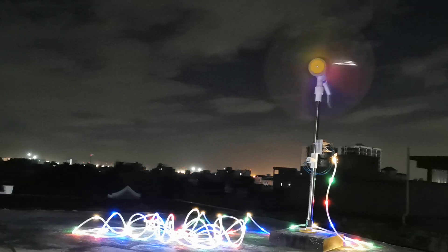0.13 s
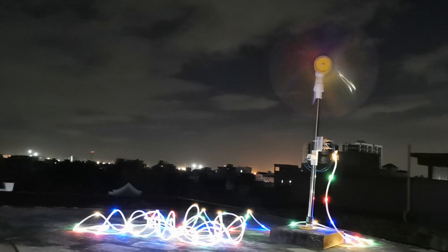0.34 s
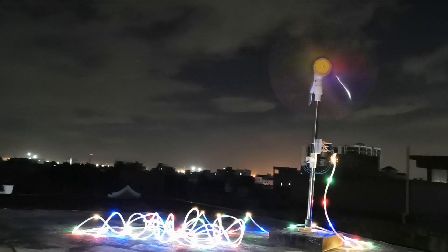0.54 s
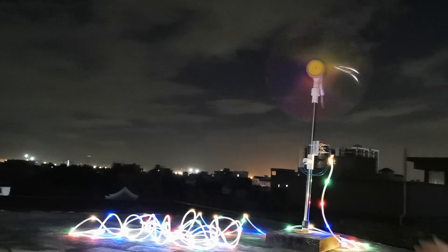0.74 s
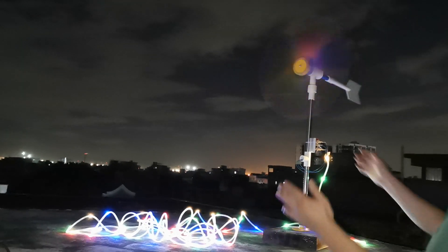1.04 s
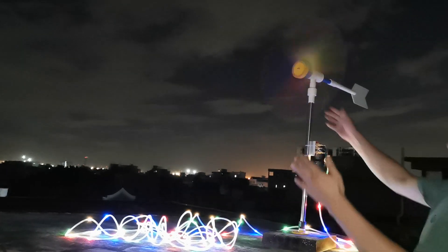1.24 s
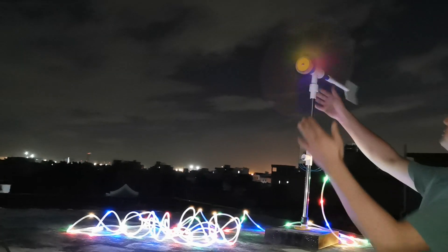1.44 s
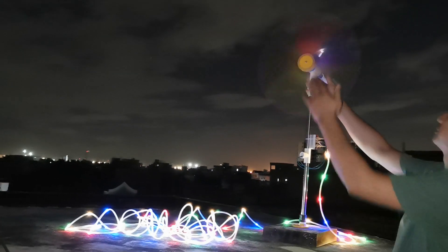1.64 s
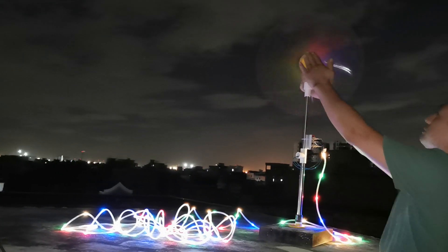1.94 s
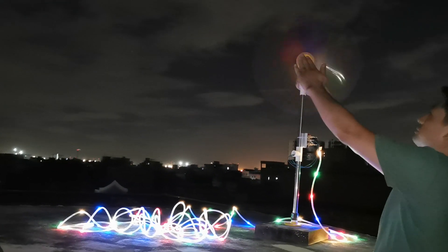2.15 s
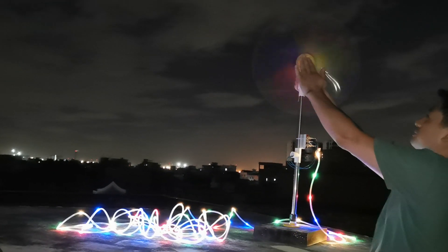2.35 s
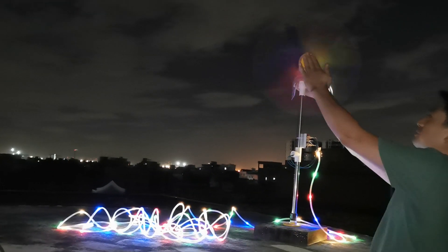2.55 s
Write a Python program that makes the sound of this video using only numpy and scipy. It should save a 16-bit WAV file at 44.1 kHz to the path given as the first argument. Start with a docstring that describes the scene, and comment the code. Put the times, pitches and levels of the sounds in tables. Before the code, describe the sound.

Wind buffeting dominates. Silence until 0.2 s, then an abrupt start of low rumble, fluttering gusts and dull slaps on a handheld stereo microphone on an open rooftop, uneven between sides, strongest on the right around 1.1-1.9 s. Faint airy hiss wavers behind. A tiny dry tick at 1.1 s; bright bangle clinks at 1.5-1.8 s, cut short by skin. Wind fades lower after 2.3 s.

```python
"""After a short silence the sound starts abruptly: gusty night wind on a handheld microphone on a rooftop.
Each of its two ports has its own rumble, flutter and slaps, made from noise and short damped swings.
Behind it hisses the air round a small wind turbine: noise whose bands swell and waver.
Later comes a dry tick of noise, then metal bangles clink on a wrist as a hand reaches up: decaying sines
with a crack of noise. The wrist turns, then skin mutes the ring."""
import sys
import numpy as np
from scipy import signal
from scipy.fft import rfft, irfft
from scipy.io import wavfile
from scipy.ndimage import uniform_filter1d, map_coordinates

SR = 44100
rng = np.random.default_rng(int(sys.argv[2]) if len(sys.argv) > 2 else 0)


def inscribe(sig):
    """Save sig as 16-bit PCM at rate SR to the path in sys.argv[1].

    A 1-D sig is mono; a 2-D sig holds one channel per row.
    Samples are clipped to [-1, 1] before scaling.
    """
    pcm = np.round(np.clip(np.atleast_2d(sig).T, -1, 1) * 32767)
    wavfile.write(sys.argv[1], SR, pcm.astype(np.int16))


def attenuation_scalar(level_db):
    """Turn a level in dB into a linear amplitude multiplier (20 dB per decade)."""
    decades = np.asarray(level_db, float) / 20
    return 10 ** decades


N = 119070

# Strength of the wind on each port: (t/s, rumble level/dB, flutter level/dB)
LEFT_GUSTS = [(0.205, -30.5, -40.5), (0.315, -17, -29), (0.335, -23, -37.5), (0.365, -18, -24),
              (0.405, -27.5, -37), (0.535, -32, -42), (0.585, -18.5, -24), (0.655, -23.5, -35),
              (0.685, -11.5, -29), (0.755, -23.5, -33.5), (0.805, -16, -31.5), (0.835, -32, -42.5),
              (0.915, -20, -24), (1.125, -23, -37), (1.215, -17, -24.5), (1.245, -30, -35.5),
              (1.335, -27, -32), (1.365, -31, -43.5), (1.515, -25, -31), (1.565, -26, -40.5),
              (1.675, -32, -38.5), (1.785, -23, -25), (1.845, -20.5, -30), (1.945, -22, -27.5),
              (1.985, -23.5, -36), (2.015, -20, -26.5), (2.065, -29, -24.5), (2.085, -18.5, -33.5),
              (2.245, -30, -42.5), (2.325, -19.5, -44), (2.365, -34, -43.5), (2.69, -39.5, -51.5)]
RIGHT_GUSTS = [(0.205, -26, -31.5), (0.305, -37.5, -26.5), (0.325, -26, -35.5), (0.355, -32, -26),
               (0.415, -19.5, -35), (0.47, -34, -26), (0.495, -26, -36), (0.545, -22, -38.5),
               (0.595, -39, -38.5), (0.645, -15, -25), (0.665, -26.5, -34), (0.705, -18.5, -22),
               (0.745, -27, -33), (0.765, -22, -27.5), (0.795, -33, -39), (0.825, -16, -29),
               (0.855, -25.5, -37), (0.895, -24, -32), (0.945, -16.5, -20.5), (0.985, -28, -26),
               (1.075, -22, -23.5), (1.125, -23, -19), (1.152, -18, -30.5), (1.225, -23, -15),
               (1.248, -24.5, -31.5), (1.345, -15, -21.5), (1.375, -24, -32.5), (1.405, -16, -28),
               (1.435, -27, -37.5), (1.455, -19.5, -26), (1.495, -19.5, -26.5), (1.53, -20.5, -22.5),
               (1.59, -27, -29), (1.63, -25, -25), (1.735, -27.5, -41.5), (1.805, -16.5, -20),
               (1.855, -14, -26), (1.895, -14.5, -24), (1.935, -27.5, -35.5), (1.965, -16.5, -25),
               (1.995, -36, -39), (2.015, -21, -30), (2.075, -32, -39.5), (2.175, -28.5, -37),
               (2.195, -30, -27.5), (2.215, -24.5, -34.5), (2.305, -26.5, -34.5), (2.405, -30.5, -33),
               (2.465, -31, -45), (2.69, -41, -44.5)]
# Colour of the rumble before the port's cut: (f/Hz, relative level per Hz/dB)
RUMBLE_COLOUR = [(12, -2), (25, 7), (40, 7.5), (65, 8), (100, -0.5), (160, 1), (300, -12.5)]
# Colour of the eddies passing a port: (multiple of the flutter pitch, relative level per Hz/dB)
EDDY_COLOUR = [(.25, -14), (.5, 5.5), (.8, 2), (1.2, -5.5), (1.8, -11), (2.6, -26), (4.0, -32), (8.0, -68)]
# Left, then right port: (rumble cut f/Hz, flutter pitch f/Hz at -30 dB in steady air,
# pitch rise/dB per dB of flutter; below zero the pitch falls as the flutter grows)
PORT_TRAITS = [(128, 170, -0.46), (205, 300, 0.2358)]
# Single strong eddies that slap the right port: (t/s, level/dB before softening)
STRONG_EDDIES = [(0.295, -22.5), (.345, -19), (0.472, -20), (0.644, -20.5), (0.705, -19), (.764, -22),
                 (1.0, -17), (1.03, -21), (1.099, -16.5), (1.119, -12), (1.13, -13), (1.197, -12),
                 (1.236, -14.5), (1.326, -28), (1.347, -18.5), (1.478, -20.5), (1.537, -9.5), (1.569, -11),
                 (1.616, -14.5), (1.807, -15), (1.835, -18), (1.873, -22), (1.912, -20)]
# Pitches at which each of three bangles rings: one list of f/Hz a bangle
BANGLE_PITCHES = [
    [4151, 6072, 8478, 11210, 14260],
    [2570, 4204, 6234, 8612, 11368, 14462],
    [6476, 11390],
]
# How those pitches ring, in the same order: (left level/dB, right level/dB, time to fall 60 dB t/s
# before a clink scales it, lead of the left/radians, level that moves to the right in the turn/dB)
BANGLE_RINGS = [
    [(0.5, 0.5, 0.14, 4.03, 7), (-0.5, -6, 0.4, 4.7, 4), (-29, -13.5, 0.65, 5.2, -5),
     (-24, -14, 0.19, 1.7, -6), (-30, -25, 0.3, 6.1, 2)],
    [(-20, -18, 2.3, 1.76, 4), (-17.5, -10.5, 1.44, -2, -5), (0.5, -13, 1.2, 4.15, 10),
     (-20, -7, 0.79, 5.5, -5), (-23, -15, 0.8, 6, 4), (-3, -3.5, 0.15, 3.5, 6)],
    [(-3.5, -4, 0.19, 1.8, 1.5), (-23, -1, 0.074, 1.6, 0)],
]
# Clinks: (t/s, level/dB on bangle one, two, three, brightness/dB per octave, multiple of the ring time)
CLINK_HITS = [(1.498, -48, -57, -54, -5, 0.21), (1.517, -34, -56, -36, 9.5, 0.45),
              (1.523, -31.5, -47, -37.5, -1.5, 0.4), (1.530, -49, -55, -39.5, 13, 0.96),
              (1.562, -40, -62, -41, -14, .2), (1.654, -43.5, -35.5, -39, 3, 1.5),
              (1.664, -34, -27.5, -47, 3, 0.71), (1.739, -32, -31, -39, 11.5, 0.76),
              (1.776, -44.5, -43, -35, -5.5, 0.66)]
# Dry ticks without a ring: (t/s, level/dB, left minus right level/dB, decay time t/s)
DRY_TICKS = [(1.123, -40.5, -10, 0.0047)]
# Colour of the hiss: (f/Hz, left and right relative level per Hz/dB, share heard by both ports)
HISS_COLOUR = [(151, -16, -21, 0.13), (625, -8.5, 2.5, 0.78), (830, -2.5, 3.5, 0.39),
               (1330, -5, -2.5, 0.067), (2080, -5.5, -4.5, 0.29), (2260, -4, -3, 0.49),
               (2940, -9, -12.5, 0.57), (3670, -10.5, -18, 1), (5170, -8, -15, 0.17),
               (7070, -14.5, -23, 0.087), (8060, -37, -26, .15), (8970, -30, -22, .2),
               (10700, -26.5, -18, 0.23), (13200, -24, -21, 0.22), (14000, -32, -25, .2),
               (16000, -45, -33, .2)]
# Swelling of the hiss: (t/s, then level/dB for low left, low right, middle left, middle right,
# treble left, treble right)
HISS_SWELL = [(.23, 6.5, 0.5, 2, 3, 1.5, 10.5), (.35, 3.5, 1, 2, 1, 0.5, 9.3),
              (.53, -0.5, -2, 5.5, 5.5, 1.5, 10), (.67, -7, -4, 3.5, 1.5, -5, 5.5),
              (.89, 4, 3.8, 7.5, 4.5, 1, 11), (1.03, -3.9, -4, 4.5, 1, -2.5, 5.5),
              (1.18, -11, 4, 0.5, 3, -2.5, 6), (1.38, -4, -4, -4.5, 4, -8.5, 7),
              (1.6, -3.5, 1, -3.5, 4.5, -2, 10.5), (1.89, -9, 0.5, -3.5, 1.5, -7, 8),
              (2.1, 2.5, 5, -0.5, 5.5, -3.5, 10), (2.3, 1.16, 3, 5, 7, -0.5, 8),
              (2.67, 2, -1.24, -7.5, -1, -6.5, 3)]
# Where the low, middle and treble swells apply in full: (low f/Hz, middle f/Hz, treble f/Hz)
SWELL_CENTRES = (1250, 2300, 5000)


def rms_one(x):
    """Scales a signal to an rms of 1."""
    return x / np.sqrt(np.mean(x ** 2) + 1e-20)


def in_time(rows):
    """Draws straight lines between the rows of a table, one value a sample for each column."""
    s, *columns = np.transpose(rows)
    return [np.interp(np.arange(N) / SR, s, column) for column in columns]


def at_hz(points, hz, axis=1):
    """Reads one column of a spectrum table, on a logarithmic frequency axis."""
    points = np.array(points)
    return np.interp(np.log(hz), np.log(points[:, 0]), points[:, axis])


def drift(rate_hz):
    """Slow random wandering of rms 1: noise smoothed twice, with rate_hz as the corner."""
    # Made at every 40th sample; the first 2000 values are dropped while the filter settles.
    r = np.exp(-80 * np.pi * rate_hz / SR)
    noise = rng.standard_normal(N // 40 + 2002)
    slow = signal.lfilter([1], [1, -2 * r, r * r], noise)[2000:]
    return np.interp(np.arange(N) / 40, np.arange(len(slow)), rms_one(slow))


def coloured(points, unit):
    """Noise with the given spectrum; unit is the cycles a sample that count as 1 in the table."""
    f = np.maximum(np.fft.rfftfreq(N) / unit, 1e-6)
    spectrum = rfft(rng.standard_normal(N)) * attenuation_scalar(at_hz(points, f))
    return rms_one(irfft(spectrum * (f > points[0][0] / 2), N))


def evened(x, span_s):
    """Takes part of the chance swings out of a noise, so that the gust shapes it."""
    even_share = 0.54
    size = int(span_s * SR)
    power = uniform_filter1d(uniform_filter1d(x ** 2, size), size)
    return rms_one(x / (power + 1e-6) ** (even_share / 2))


def wind(rows, cut_hz, pitch_hz, rise):
    """A frozen train of eddies streams past the port over a rumble, wavering in pitch and level.

    Stronger flutter is lower on the left port and higher on the right.
    """
    rumble_db, flutter_db = in_time(rows)
    gust = drift(30.38)
    speed_swing, lump_db = 0.1, 1.5   # pitch and level waver with the gust

    # The train is noise with 64 samples a cycle, read at a changing speed.
    step = 64
    hz = pitch_hz * attenuation_scalar(rise * (flutter_db + 30)) * np.exp(speed_swing * gust)
    place = np.cumsum(hz) / SR * step
    eddies = map_coordinates(coloured(EDDY_COLOUR, 1 / step), [place], order=3, mode="grid-wrap")
    flutter = attenuation_scalar(flutter_db + lump_db * gust) * evened(eddies, 0.041)

    low_pass = signal.butter(4, cut_hz, fs=SR, output="sos")
    rumble = signal.sosfilt(low_pass, coloured(RUMBLE_COLOUR, 1 / SR))
    return attenuation_scalar(rumble_db) * evened(rumble, 0.038) + flutter + crackle(flutter_db)


def slap(clicks):
    """Each click becomes a push of pressure that swings out and back a few times, then is softened."""
    swing_hz, t60_s, soft_hz = 393, 0.0085, 832
    r = attenuation_scalar(-60 / (t60_s * SR))
    w = 2 * np.pi * swing_hz / SR
    swing = signal.lfilter([0, 2 * np.sin(w)], [1, -2 * r * np.cos(w), r * r], clicks + 1e-18)
    return signal.sosfilt(signal.butter(4, soft_hz, fs=SR, output="sos"), swing)


def crackle(flutter_db):
    """Small eddies slap at random, with strengths scattered around that of the flutter."""
    per_s, offset_db, spread_db = 70, -2, 4
    born = rng.random(N) < per_s / SR
    sign = rng.choice([-1, 1], N)
    level_db = flutter_db + offset_db + spread_db * rng.standard_normal(N)
    return slap(born * sign * attenuation_scalar(level_db))


def slaps():
    """The strongest eddies push the right port only."""
    s, db = np.transpose(STRONG_EDDIES)
    clicks = np.zeros(N)
    clicks[(s * SR).astype(int)] = 2 * attenuation_scalar(db)
    return slap(clicks) * [[0], [1]]


def burst(s, length_s):
    """A short dying burst of bright noise, partly alike at both ports."""
    low_cut_hz = 1800
    t = np.arange(N) / SR - s
    noise = rng.standard_normal((3, N))
    fade = (t >= 0) * np.exp(-np.maximum(t, 0) / length_s)
    puff = (noise[:2] + noise[2]) * fade + 1e-18   # the third noise is shared
    return signal.sosfilt(signal.butter(2, low_cut_hz, "high", fs=SR, output="sos"), puff)


def bangles():
    """Each clink cracks and rings the metal; skin shortens the ring, the turning wrist aims it elsewhere."""
    turn_from_s, turn_to_s = 1.774, 1.786
    mute_from_s, mute_db_per_s = 1.832, 160.5
    scatter_db = 1.5
    crack_db, crack_s, crack_pan_db = -9.5, 0.0038, -2   # the pan acts on the left port
    out = np.zeros((2, N))
    for s, *strengths, bright_db, free in CLINK_HITS:
        i = int(s * SR)
        t = np.arange(N - i)[:SR // 2] / SR
        turn = np.interp(s + t, [turn_from_s, turn_to_s], [0, 1]) * [[-1], [1]]
        mute_db = mute_db_per_s * np.maximum(s + t - mute_from_s, 0)
        for pitches, rings, db in zip(BANGLE_PITCHES, BANGLE_RINGS, strengths):
            for hz, (left_db, right_db, t60, lead, swing_db) in zip(pitches, rings):
                hit_db = db + bright_db * np.log2(hz / 6000) + rng.normal(0, scatter_db)
                start_db = hit_db + np.array([[left_db], [right_db]])
                decay_db = 60 * t / (t60 * free)
                level = attenuation_scalar(start_db + swing_db * turn - mute_db - decay_db)
                tone = np.sin(2 * np.pi * hz * t + np.array([[lead], [0]]))
                out[:, i:i + len(t)] += level * tone
        level_db = max(strengths) + crack_db + max(bright_db, 0)
        out += attenuation_scalar(level_db + np.array([[crack_pan_db], [0]])) * burst(s, crack_s)
    return out


def ticks():
    """Dry ticks: bursts of bright noise without any ring."""
    out = np.zeros((2, N))
    for s, db, pan_db, length_s in DRY_TICKS:
        out += attenuation_scalar(db + np.array([[pan_db / 2], [-pan_db / 2]])) * burst(s, length_s)
    return out


def hiss():
    """Air noise partly shared by the ports, the shared part later on the left; each band wavers."""
    level_db, patchy_db, left_lag_s = -78, 2, 7e-5
    f = np.fft.rfftfreq(N, 1 / SR)
    swell = np.reshape(in_time(HISS_SWELL), (3, 2, N))
    shared, *own = rfft(rng.standard_normal((3, N)))
    alike = np.clip(at_hz(HISS_COLOUR, f + 1, axis=3), 0, 1)
    late = np.exp(-2j * np.pi * f * np.array([[left_lag_s], [0]]))
    colour_db = np.array([at_hz(HISS_COLOUR, f + 1, axis=k) for k in (1, 2)])
    colour = attenuation_scalar(level_db + colour_db) * np.sqrt(SR / 2)
    air = colour * (np.sqrt(alike) * shared * late + np.sqrt(1 - alike) * np.array(own))

    out = np.zeros((2, N))
    for hz in 125 * 2 ** np.arange(0, 7.1, 1 / 3):   # overlapping bands a third of an octave apart
        band = np.cos(np.pi / 2 * np.clip(3 * np.log2((f + 1) / hz), -1, 1)) ** 2
        # Blend the two nearest of the low, middle and treble swells.
        k = np.interp(np.log(hz), np.log(SWELL_CENTRES), [0, 1, 2])
        swell_db = sum(max(1 - abs(k - j), 0) * swell[j] for j in range(3))
        out += irfft(air * band, N) * attenuation_scalar(swell_db + patchy_db * drift(9.7))
    return out


def scene():
    """Adds wind on both ports, slaps, bangles, ticks and the hiss behind them."""
    left = wind(LEFT_GUSTS, *PORT_TRAITS[0])
    right = wind(RIGHT_GUSTS, *PORT_TRAITS[1])
    return np.array([left, right]) + slaps() + bangles() + ticks() + hiss()


def top_cut(x):
    """Nothing passes above the cut-off."""
    return signal.sosfilt(signal.butter(12, 16310, fs=SR, output="sos"), x)


def record(dry):
    """Cuts the top of the treble and keeps silence up to the abrupt start."""
    top_cut_hz, start_s = 15700, 0.2009
    cut = signal.sosfilt(signal.butter(8, top_cut_hz, fs=SR, output="sos"), dry)
    mix = cut * (np.arange(N) >= start_s * SR)
    return top_cut(mix)


dry = scene()
out = record(dry)
inscribe(out)
```